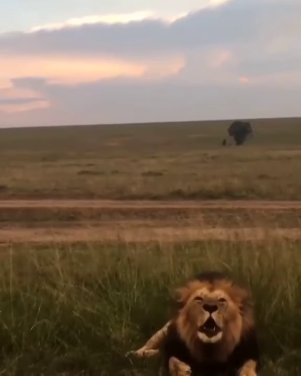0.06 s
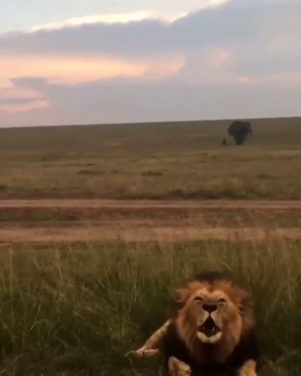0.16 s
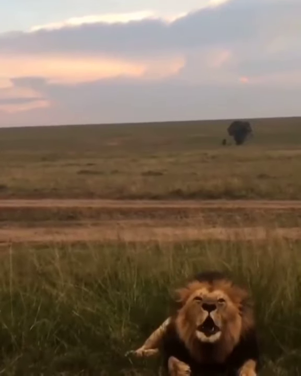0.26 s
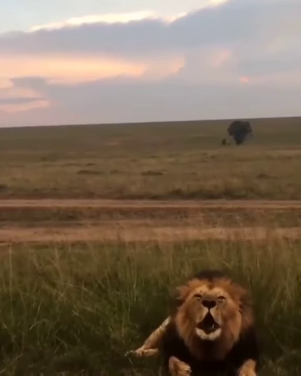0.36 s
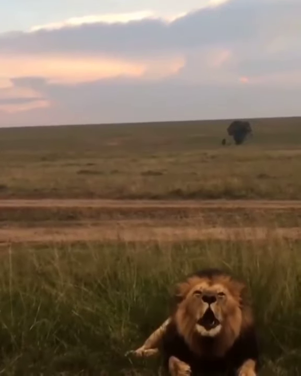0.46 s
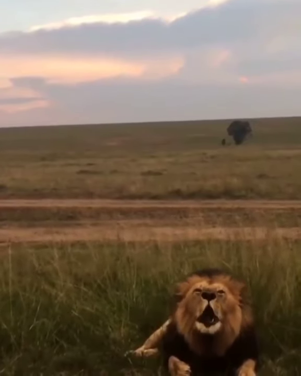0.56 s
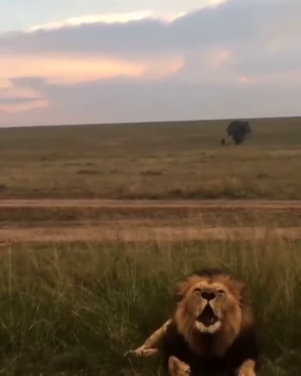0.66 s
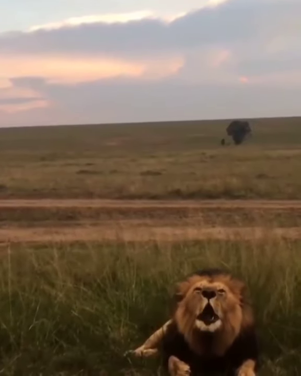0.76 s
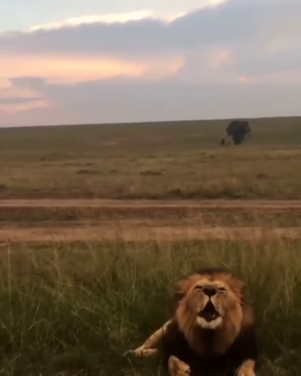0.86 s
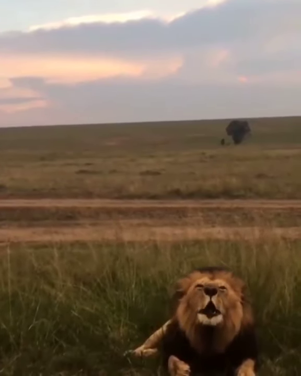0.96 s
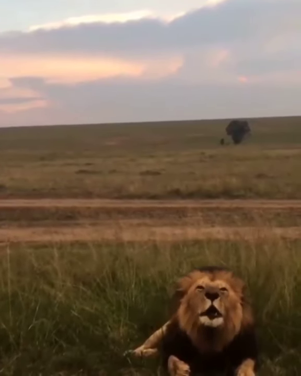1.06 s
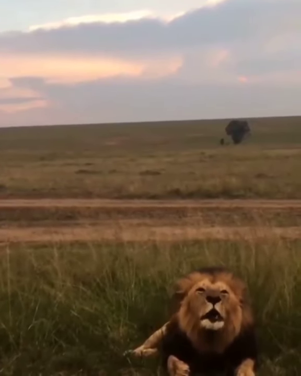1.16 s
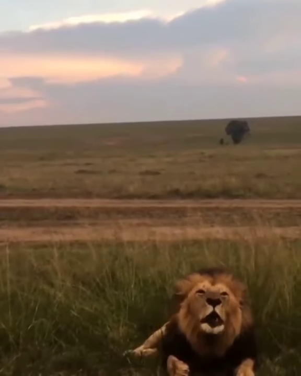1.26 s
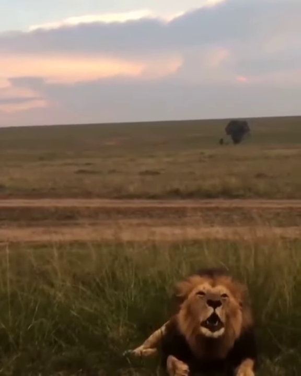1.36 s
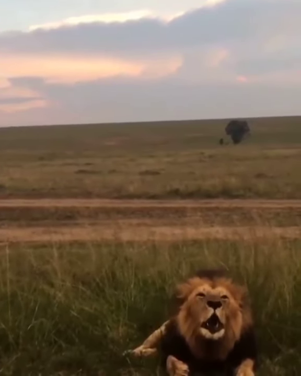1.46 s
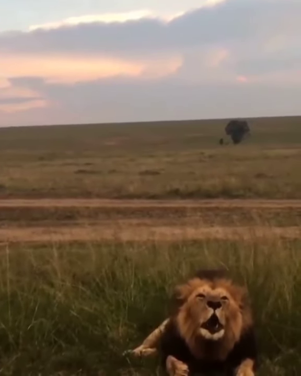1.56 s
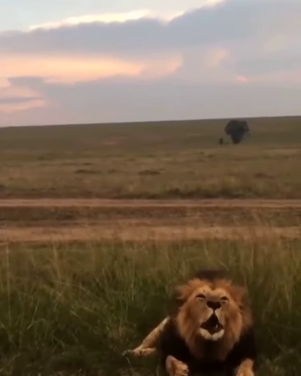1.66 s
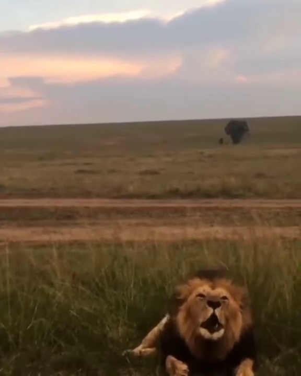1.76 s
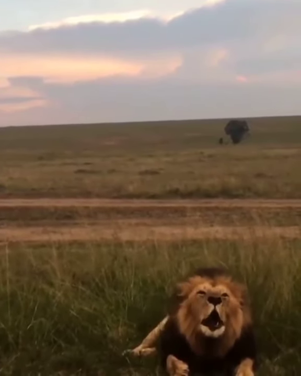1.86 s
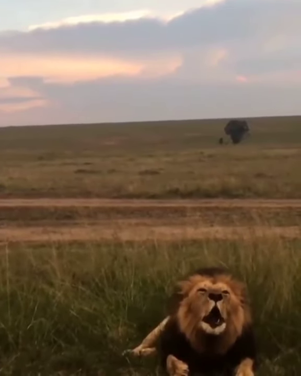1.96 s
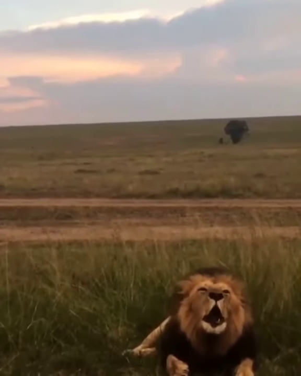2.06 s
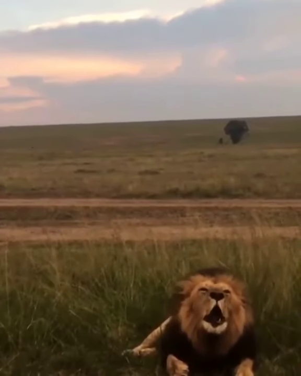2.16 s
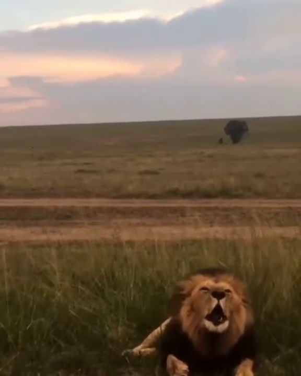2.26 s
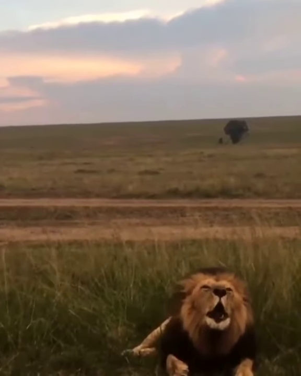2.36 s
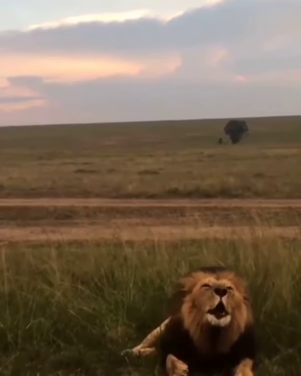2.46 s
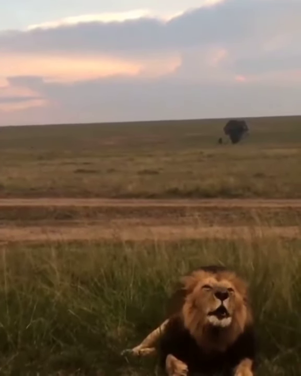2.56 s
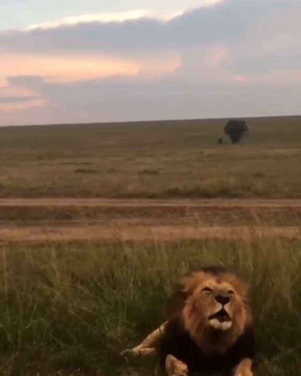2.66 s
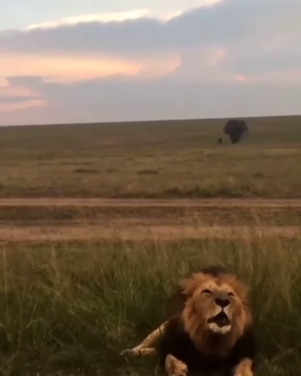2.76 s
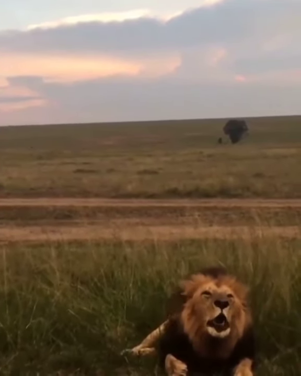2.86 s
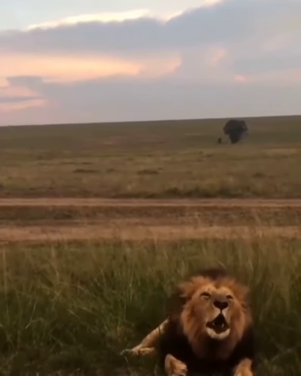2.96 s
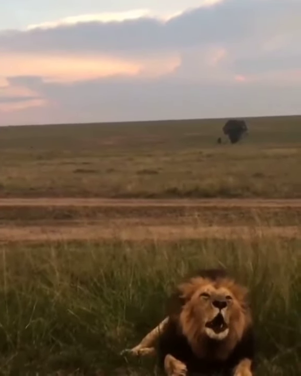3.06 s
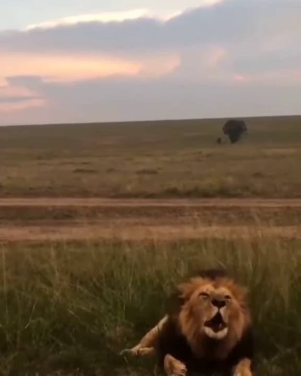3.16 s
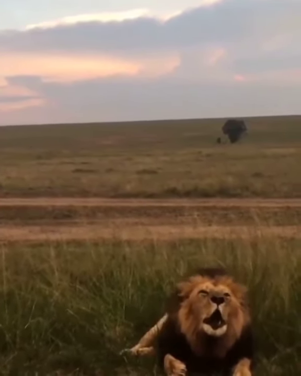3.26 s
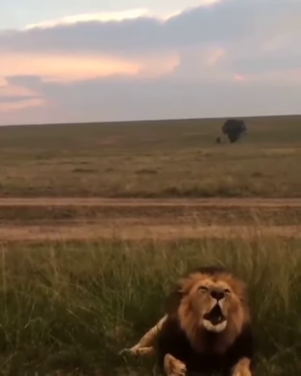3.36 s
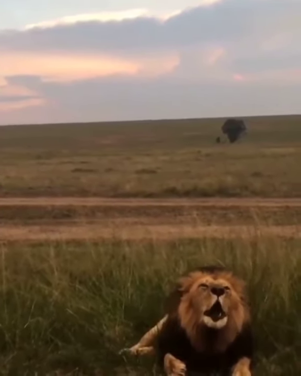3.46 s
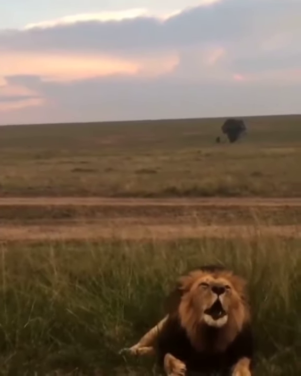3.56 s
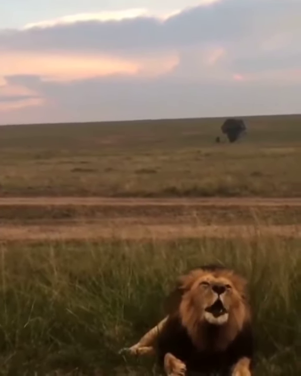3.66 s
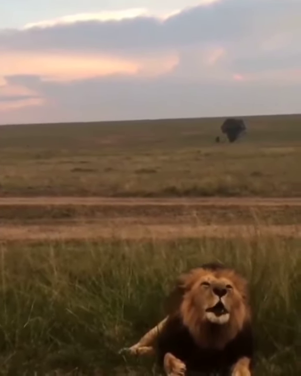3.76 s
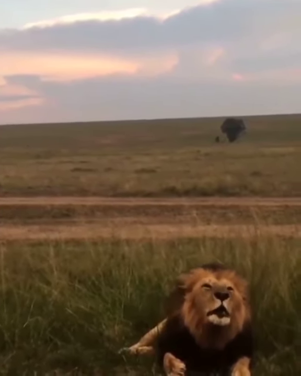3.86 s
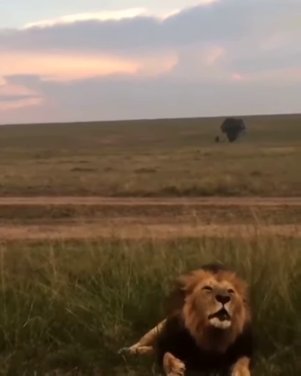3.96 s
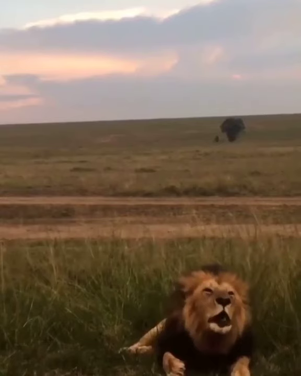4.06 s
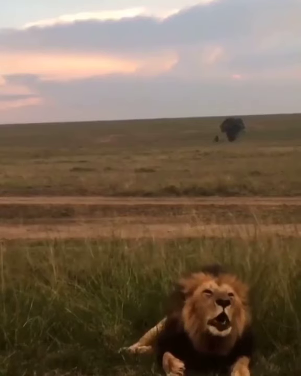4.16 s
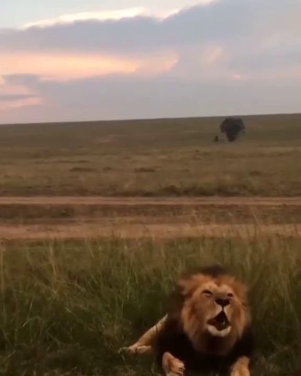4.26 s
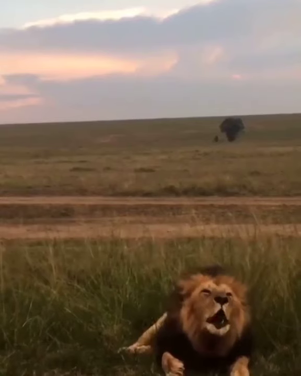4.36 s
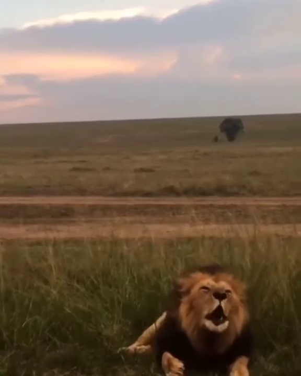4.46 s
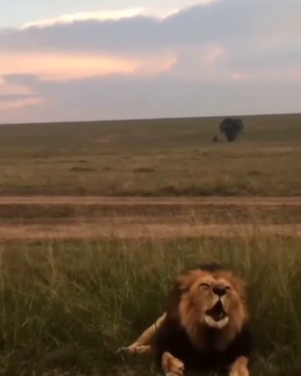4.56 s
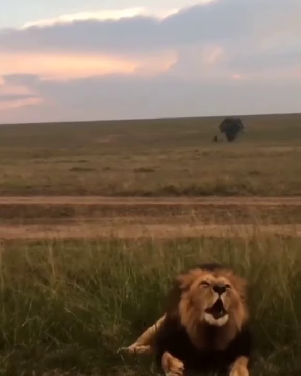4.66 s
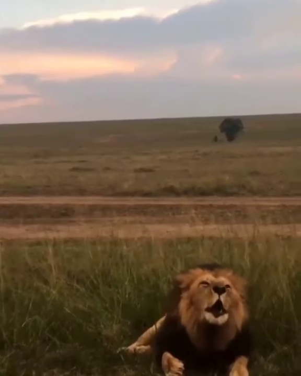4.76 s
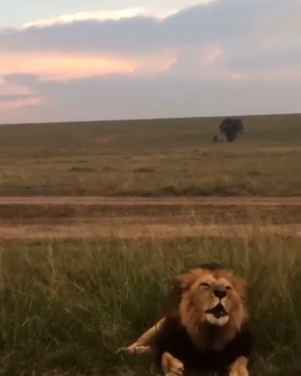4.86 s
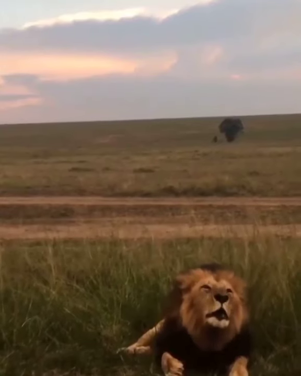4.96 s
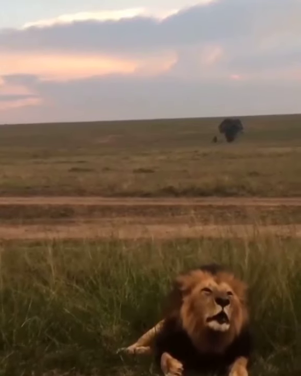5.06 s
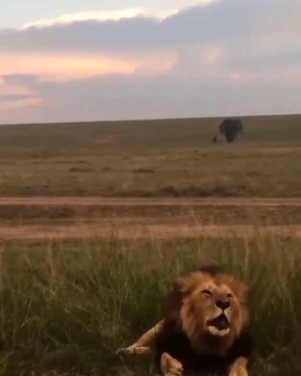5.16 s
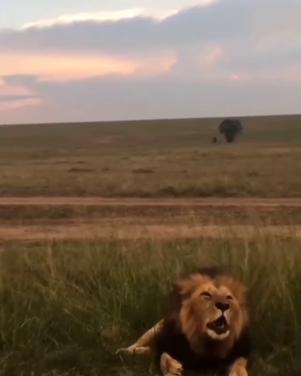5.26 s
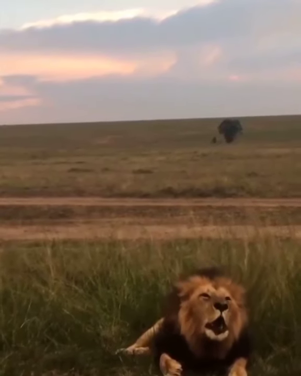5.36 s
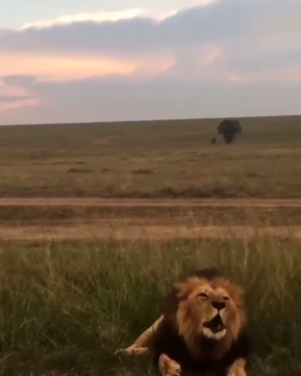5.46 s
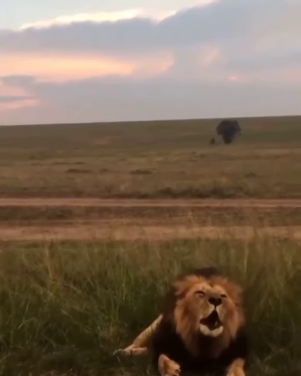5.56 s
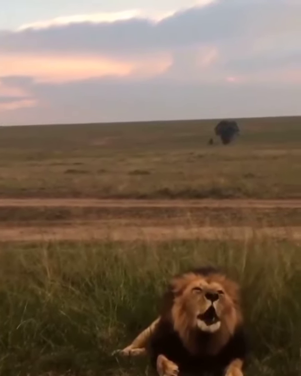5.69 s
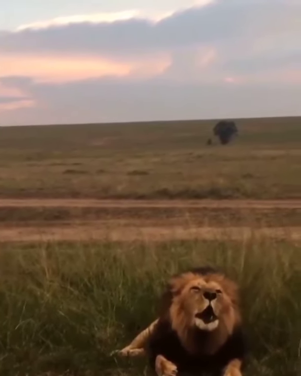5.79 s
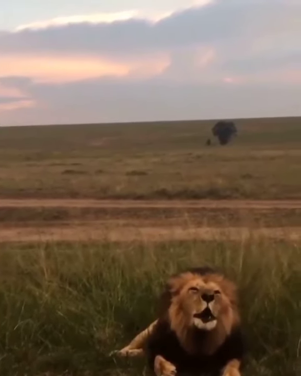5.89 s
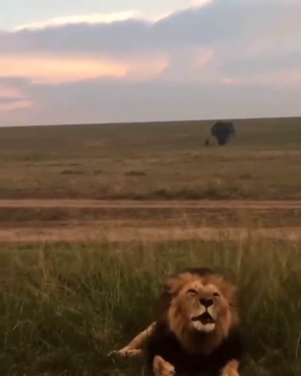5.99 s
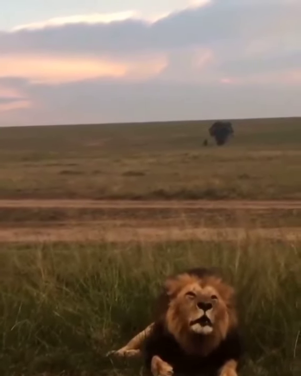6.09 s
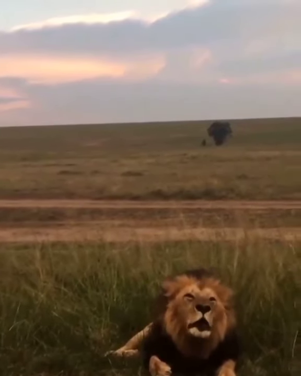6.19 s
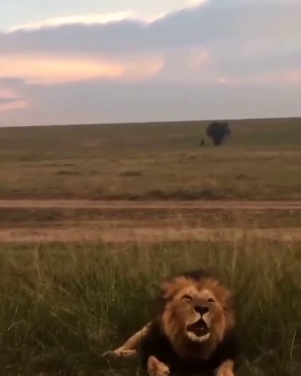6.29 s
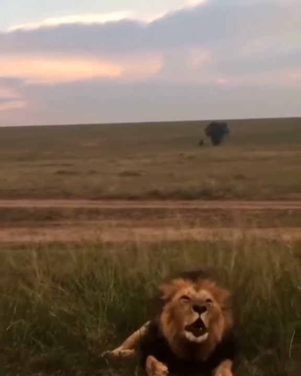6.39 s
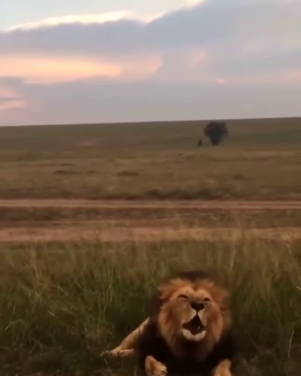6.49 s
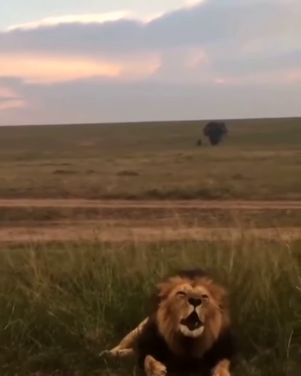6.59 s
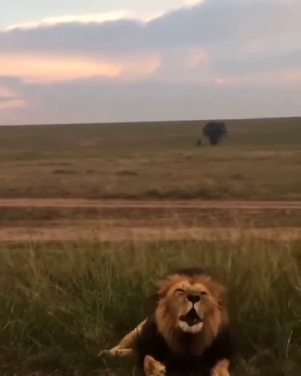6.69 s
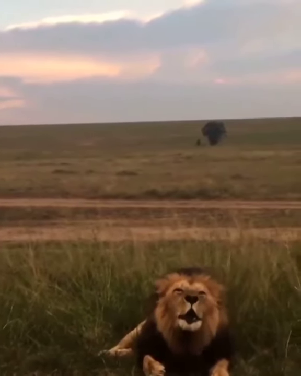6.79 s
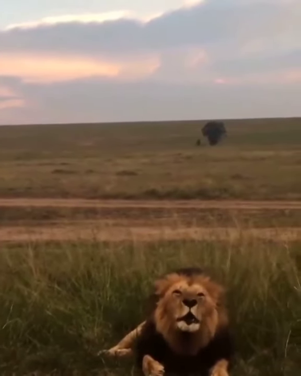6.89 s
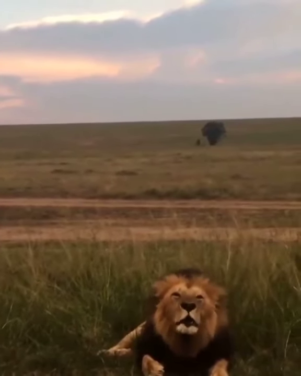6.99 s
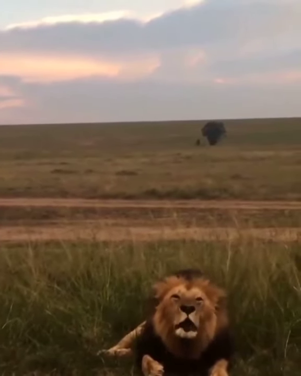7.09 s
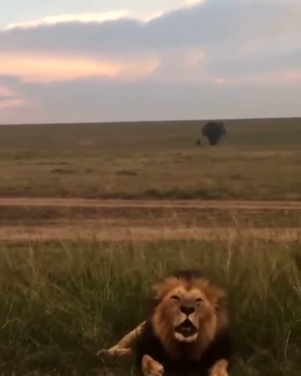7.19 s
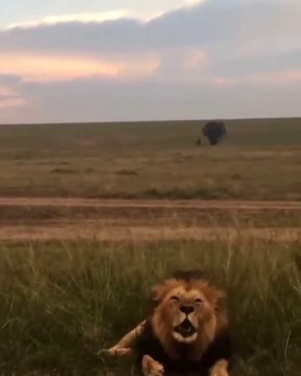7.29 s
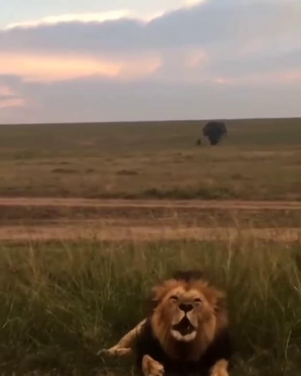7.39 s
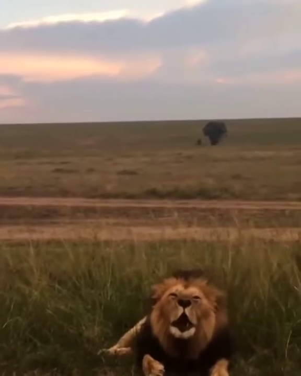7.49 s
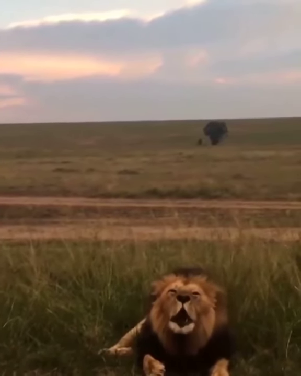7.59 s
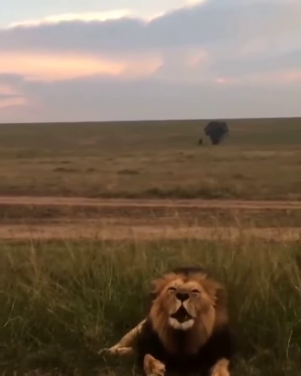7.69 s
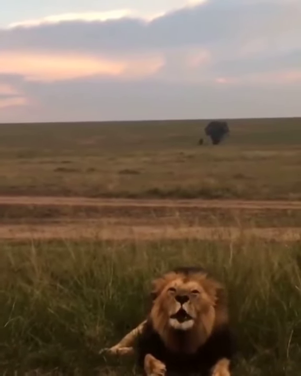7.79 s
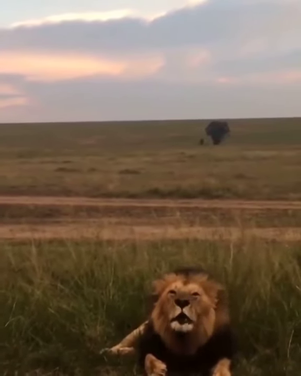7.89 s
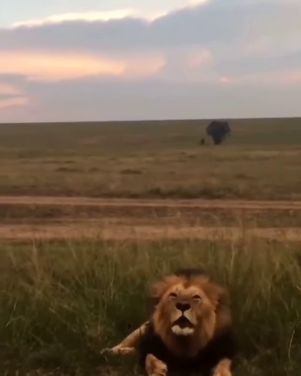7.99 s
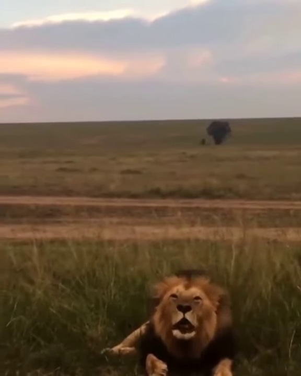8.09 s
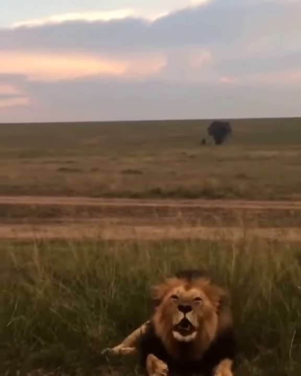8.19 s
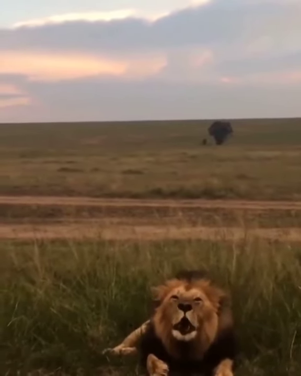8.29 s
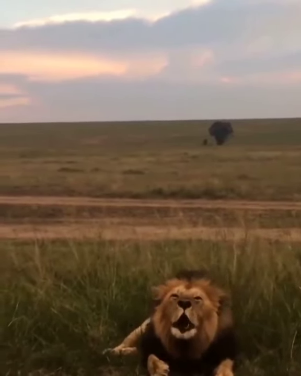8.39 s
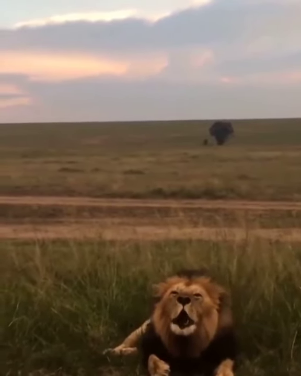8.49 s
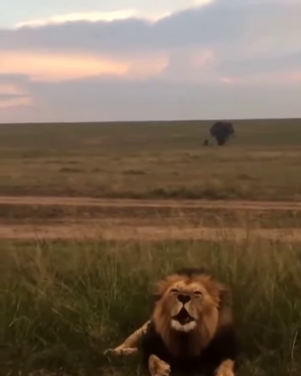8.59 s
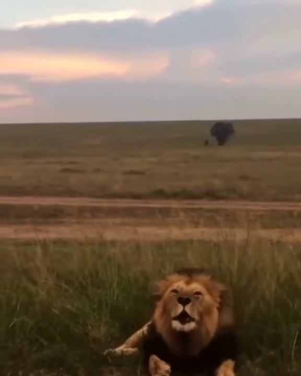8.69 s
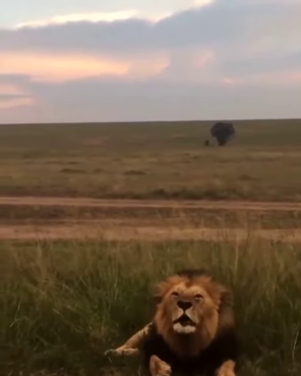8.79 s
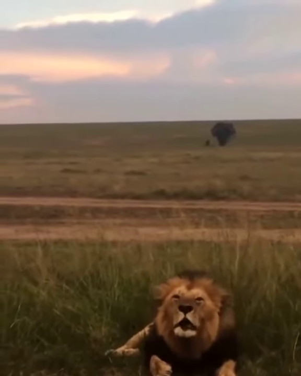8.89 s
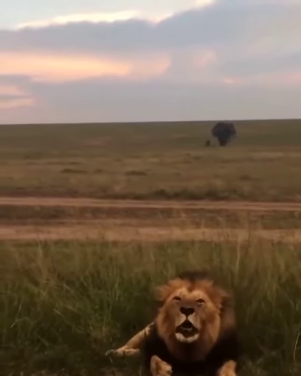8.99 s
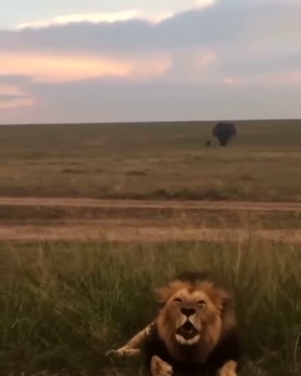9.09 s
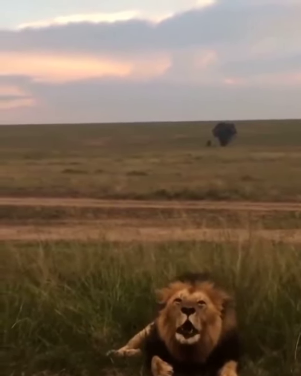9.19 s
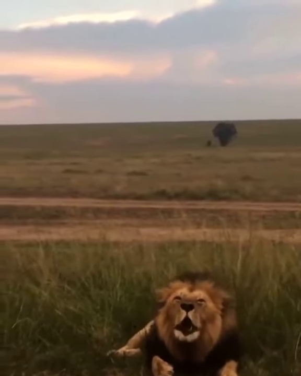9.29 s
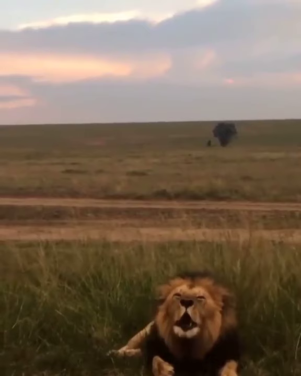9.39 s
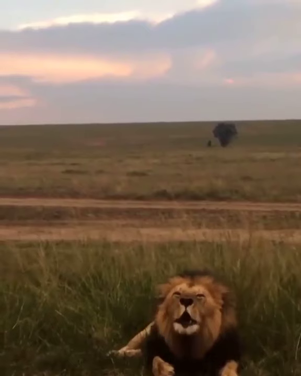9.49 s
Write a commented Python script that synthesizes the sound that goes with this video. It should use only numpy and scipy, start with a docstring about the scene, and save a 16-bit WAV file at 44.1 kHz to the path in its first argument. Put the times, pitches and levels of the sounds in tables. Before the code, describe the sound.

Close lion roaring outdoors: two long throaty roars, then progressively shorter, rougher barking grunts about a second apart, with faint gasps and soft wind rumble.

```python
"""Open grassland: a male lion lies close by and roars, long roars that shorten into a run of grunts.
Each roar is a string of clicks from his slack vocal folds plus puffs of air, ringing a long throat,
mouth and muzzle; the folds slap irregularly and steady into a tone at the height of the long roars.
Shaped noise makes the hiss of his breath, a faint murmur before each call, the gasps between calls
and the low rumble of wind; one faint squeak is a falling sine."""
import sys
import numpy as np
from scipy import signal
from scipy.io import wavfile
from scipy.ndimage import uniform_filter1d

SR = 44100
rng = np.random.default_rng(int(sys.argv[2]) if len(sys.argv) > 2 else 0)


def log_audio(samples):
    """Write samples as a 16-bit WAV file to the path given in sys.argv[1]."""
    # one column per channel
    frames = np.atleast_2d(samples).T
    # limit to full scale, then quantise
    limited = np.clip(frames, -1, 1)
    pcm = np.round(limited * 32767).astype(np.int16)
    wavfile.write(sys.argv[1], SR, pcm)


N = 420713
TIME = np.arange(N) / SR  # [s]
CUT_S = 0.022  # softness of the edges of calls and murmurs [s]

# The calls, one push of air each: (start [s], hold [s], release [s], effort [dB], sag over the hold [dB],
# top pitch before any leap [Hz], climb to the top [s], pitch fall [s],
# widest mouth [factor on the throat], extra mouth ring [dB])
CALLS = [ (0.447, 0.62, 0.057, -9.5, 3, 101.6, 0.29, 0.3, 1.13, 0.5),
         (1.89, 0.68, 0.064, -11.5, 0.5, 103, 0.37, .24, 1.134, .5),
         (3.358, .45, 0.075, -11.5, 1.8, 104.4, 0.22, .25, 1.065, 0.5),
         (4.55, 0.36, 0.095, -9, 6, 100.9, .16, .21, 1.064, 0.5),
         (5.665, 0.33, 0.15, -8, 7.5, 96.36, 0.15, 0.19, 1.04, 0.5),
         (6.672, 0.23, 0.1, -10, 4, 86.37, .11, .115, 1.037, -0.5),
         (7.621, 0.25, 0.085, -9, 6.5, 87.87, 0.12, .13, 1, -2.5),
         (8.546, 0.21, .1, -9, 5.5, 87.2, .11, 0.097, 1.014, -1.5),
         (9.43, .21, 0.079, -7, 10.5, 86.5, 0.13, .11, 1.04, -1.5)]
# Low resonances of the long throat: (pitch [Hz], width [Hz], relative level [dB],
# how far it follows the mouth [share, negative = the other way], gain per unit of opening [dB])
CHEST_RINGS = [(100.4, 84, -2.5, 0.5, -36), (147.8, 77.2, 5, .95, -6.5), (342, 52.3, -1.06, 0.78, 36.5),
               (448.5, 63, -16, 0.42, -28.5), (580, 88, -27.5, 0.1, 76.5), (726, 68, -26.5, 0.5, 26)]
# Resonances of the mouth, same columns
MOUTH_RINGS = [(860, 114, -12, -0.12, -20.5), (1032, 73, -0.5, 0.11, 16.5), (1146, 83, 1.5, 0.39, -3.5),
               (1346, 110, -4, 0.34, 8.5), (1530, 77, -10, 0.4, 8.5)]
# High resonances of the muzzle, same columns
MUZZLE_RINGS = [(1973, 130, 3.5, -0.0077, -9), (2260, 95, -2, .1, 8), (2590, 140, 2, 0.25, -10),
                (2802, 87, 3.5, 0.14, -8.5), (3136, 220, 0.5, 0.0048, -18.5), (3984, 240, -2, 0.17, -6.5),
                (4420, 220, -2.5, 0.22, -14), (5740, 1660, -9, .2, -10)]
# The bright edge that a hard-driven voice rings, same columns
EDGE_RINGS = [(4310, 160, 0, 0.053, 0.0014)]
# Colour of the rushing air: (frequency [Hz], relative level per Hz [dB])
AIR_COLOUR = [(600, -24.5), (1400, 8), (2300, -2.5), (2800, -7), (3650, 1.5), (4850, -3), (5600, -1.5),
              (7000, -3), (8900, -4), (9700, -8.5), (11800, -6.5), (14000, -16)]
# The mouth rings out briefly as the pitch glides: (middle [s], half length [s], boost [dB])
MOUTH_FLARES = [(.585, 0.022, 3.5), (3.551, .025, 4.5), (3.74, .02, 5), (4.843, 0.028, 10),
                (5.905, .02, 7.5)]
# How the chest answers the folds: (level against the effort [dB], change when locked [dB],
# in the high register [dB], in a full surge [dB], in the tail [dB])
CHEST_ANSWER = (0, -1.5, -3.5, 3, -0.5)
# How the mouth answers, same columns
MOUTH_ANSWER = (-15, -2, -2.5, 4.5, -3.5)
# How the hiss of breath answers, same columns
HISS_ANSWER = (-24.5, 0.5, -4, 1.5, -1.5)


def roars(muzzle_db=-3, air_db=-3, edge_db=-27.0, edge_rough_db=13.0, edge_growth=1.0,
          air_click=0.13, gentle=0.24, flutter_db=0.53, break_db=-9, tail_flutter=0.8, hiss_growth_db_per_s=7.5):
    """Fold pulses and turbulence ring the throat, mouth and muzzle; air rushes past the teeth."""
    effort_db, pitch, opening, bright_db, tail, gate = call_controls()
    locked, rough, leap, high, swell_db, breaks = registers()
    surge = surges() * (1 + tail_flutter * tail)  # slaps stand out more in the tail

    def answer(table):
        base_db, *change_db = table
        return base_db + sum(db * state for db, state in zip(change_db, (locked, high, surge, tail)))

    chest_db, ring_db, hiss_db = answer(CHEST_ANSWER), answer(MOUTH_ANSWER), answer(HISS_ANSWER)
    # the hiss gains on the voice as a call goes on
    for start, hold, *_ in CALLS:
        during = window(start, start + hold + CUT_S, CUT_S)
        hiss_db = hiss_db + hiss_growth_db_per_s * (TIME - start) * during
    for middle, half, db in MOUTH_FLARES:
        ring_db = ring_db + db * np.exp(-((TIME - middle) / half) ** 2)

    # a slam adds little bass and much bite, so the bass gets softer slaps
    pulses = fold_pulses(pitch * leap, rough)
    thuds = with_slaps(pulses, softer_db=-6)
    snaps = with_slaps(pulses)
    clicks = steadied(snaps)
    low_air = puffs(thuds, decay_s=.005, leak=.4)
    mid_air = puffs(snaps, decay_s=.003, leak=.8)
    high_air = puffs(snaps, decay_s=.003, leak=1.3)
    rush_air = puffs(snaps, decay_s=.0022, leak=4)
    low_drive = steadied(thuds) + (.1 + .4 * rough) * low_air
    mid_drive = clicks + (.6 + .35 * rough) * mid_air
    high_drive = .55 * clicks + high_air

    low_cut = signal.butter(2, 44, "high", fs=SR, output="sos")
    soft_drive = mellowed(low_drive, gentle * locked * high)
    chest = steadied(signal.sosfilt(low_cut, throat(soft_drive, CHEST_RINGS, opening)))
    mouth = steadied(throat(mid_drive, MOUTH_RINGS, opening, quiver=.012, quiver_db=2))
    muzzle = steadied(throat(high_drive, MUZZLE_RINGS, opening, quiver=.024, quiver_db=3.3))
    edge = steadied(throat(high_drive, EDGE_RINGS, opening, quiver=.012))
    air = steadied(coloured(air_click * clicks + rush_air, AIR_COLOUR))

    # the edge grows faster than the voice itself
    bite_db = edge_db + edge_rough_db * rough + edge_growth * (effort_db + chest_db)
    voice = amp(chest_db + swell_db + break_db * breaks) * chest
    voice = voice + amp(ring_db + bright_db) * mouth + amp(bite_db) * edge
    rush_level = amp(hiss_db + swell_db + flutter_db * wobble(size=600))
    rush = rush_level * (amp(muzzle_db) * muzzle + amp(air_db) * air)
    return amp(effort_db) * gate * (voice + rush)


def call_controls(onset_db=-32.5, attack_s=0.026, tail_db=-16, tail_s=0.12, slack_hz=56.69,
                  climb_share=.87, arch_power=2.3, shut=0.748, ajar=0.942, open_s=.04, close_power=2.63):
    """Each push of air swells, sags and sinks to a growl; pitch arches up and back, the mouth opens fast, shuts slowly."""
    effort_db, pitch, opening = np.full(N, -100.), np.full(N, 1. * slack_hz), np.full(N, 1. * shut)
    bright_db, tail, gate = np.zeros((3, N))
    for start, hold, release, db, sag_db, top_hz, climb, fall, gape, brightness in CALLS:
        now = TIME >= start
        t = TIME[now] - start
        tail[now] = np.clip((t - hold) / release, 0, 1)
        swell_db = onset_db * np.exp(-t / attack_s)
        sink_db = tail_db * tail[now] - sag_db * np.minimum(t / hold, 1)
        effort_db[now] = db + swell_db + sink_db
        from_top = abs(t - climb) / np.where(t < climb, climb_share * climb, fall)
        pitch[now] = slack_hz + (top_hz - slack_hz) * np.exp(-from_top ** arch_power)
        opened = gape + (ajar - gape) * np.exp(-t / open_s)
        closing = np.minimum(t / (hold + tail_s), 1) ** close_power
        opening[now] = opened + (shut - opened) * closing
        bright_db[now] = brightness
        gate[now] = window(start, start + hold + tail_s, CUT_S)[now]
    return effort_db, pitch, opening, bright_db, tail, gate


# In the long roars the folds lock into a tone: (start [s], length [s], roughness [0-1], leap in pitch [factor])
LOCKED_TONES = [(0.678, 0.21, .06, 1.64), (2.151, .26, 0.07, 1.64), (3.491, 0.21, 0.12, 1),
                (4.7, .19, .27, 1), (5.795, .15, .34, 1)]


def registers(loose_rough=.66, lock_s=.025, leap_s=0.011, early_s=.115, late_s=.04,
              break_s=0.011, swell_db_per_s=20.5):
    """Locked folds slap less roughly; some leap to a high register that swells, with a break at each change."""
    locked, high, swell_db, breaks = np.zeros((4, N))
    rough, leap = np.full(N, loose_rough), np.ones(N)
    for start, length, tone_rough, factor in LOCKED_TONES:
        end = start + length
        lock = window(start, end, lock_s)
        locked += lock
        rough += (tone_rough - loose_rough) * lock
        if factor > 1.3:
            # the high register begins before the tone and outlasts it
            up = window(start - early_s, end + late_s, leap_s)
            high += up
            leap += (factor - 1) * up
            swell_db += swell_db_per_s * (TIME - start - length / 2) * lock
            for s in (start - early_s * .6, end + late_s / 2):
                breaks += np.exp(-((TIME - s) / break_s) ** 2)
    return locked, np.clip(rough, 0, 1), leap, high, swell_db, breaks


def fold_pulses(hz, rough, shimmer_db=3.5, limp_db=5.0):
    """One click a closure; rough folds stumble in time and alternate strong and weak."""
    turns = np.cumsum(hz * np.exp(.13 * rough * wobble(size=260))) / SR
    at = np.flatnonzero(np.diff(np.floor(turns)) > 0)
    chance = np.clip(rng.standard_normal(N)[at], -2, 1.2)
    strong_weak = (-1) ** np.arange(len(at))
    pulses = np.zeros(N)
    pulses[at] = amp(rough[at] * (shimmer_db * chance + limp_db * strong_weak))
    return pulses


# Single hard slaps of the folds: (time [s], level over a plain click, before any softening [dB])
HARD_SLAPS = [(0.547, 11.5), (1.149, 1), (1.941, 7), (2.007, 11.5), (2.661, 14.5), (3.391, 11.5),
              (3.907, 13), (4.582, 12), (4.621, 7.5), (4.945, 11), (5.005, 9), (5.691, 9), (5.765, 8.5),
              (6.024, 10), (6.079, 15.5), (6.705, 4.5), (6.745, 4), (6.779, 11.5), (6.993, 8.5), (7.665, 7),
              (7.691, 9), (7.727, 12), (7.749, 14.5), (7.959, 14), (8.588, 6), (8.614, 3), (8.651, 8.5),
              (8.85, 2), (9.478, 11.5)]


def with_slaps(pulses, softer_db=0):
    """Now and then one closure is a hard slam that takes the place of its neighbours."""
    out = pulses.copy()
    for s, db in HARD_SLAPS:
        at = round(s * SR)
        out[max(at - 260, 0):at + 200] = 0
        out[min(at, N - 1)] = amp(db + softer_db)
    return out


def surges(full_db=13, fade_s=.024):
    """Each hard slap lets a brief surge of air through."""
    surge = np.zeros(N)
    for s, db in HARD_SLAPS:
        fade = np.exp(-abs(TIME - s) / fade_s) * (TIME >= s)
        surge = np.maximum(surge, amp(db - full_db) * fade)
    return surge


def puffs(pulses, decay_s, leak):
    """Turbulence: a burst of noise at each closure over a steady leak of air."""
    bursts = signal.lfilter([1], [1, -np.exp(-1 / (decay_s * SR))], pulses)
    return steadied((steadied(bursts) + leak) * rng.standard_normal(N))


def mellowed(x, share, corner_hz=150):
    """Folds that close gently lose their upper harmonics: blends in a low-passed copy."""
    r = np.exp(-2 * np.pi * corner_hz / SR)
    dull = signal.lfilter([1 - r], [1, -r], x)
    return x + np.clip(share, 0, 1) * (dull - x)


def throat(x, modes, opening, quiver=0, quiver_db=0):
    """Steep resonances that move as the mouth opens and quiver with its soft walls."""
    out = np.zeros(N)
    for k, (hz, width, db, follow, open_db) in enumerate(modes):
        centre = hz * (1 + follow * (opening - 1) + quiver * wobble(size=2400))
        # shift the resonance down to 0 Hz, low-pass there, shift back
        turn = np.exp(2j * np.pi * np.cumsum(centre) / SR)
        r = np.exp(-np.pi * width / SR)
        ring = signal.lfilter([(1 - r) ** 2], [1, -2 * r, r * r], x * turn.conj() + 1e-18)
        level = amp(db + open_db * (opening - 1) + quiver_db * wobble(size=1800))
        out += (-1) ** k * level * (turn * ring).real  # neighbours alternate in sign
    return out


# Gasps after the calls: (middle [s], level before flutter [dB], length [s])
GASP_TIMES = [(1.37, -57, .12), (1.46, -54, .08), (2.89, -65, .25), (4.035, -58, .08), (4.11, -52, .07),
              (5.1, -59, .1), (5.185, -52, .09), (7.25, -64.5, .32), (8.17, -66, .25), (9.06, -71, .22)]
# Colour of the gasps: (frequency [Hz], relative level per Hz [dB])
GASP_TINT = [(240, -31), (400, -5.5), (431, -2), (464, -14.5), (663, 3), (817, -7), (867, -8), (1640, -4.5),
             (2120, -10), (3360, -11.5), (4870, -17.5), (12600, -25), (14000, -41)]


def gasps(flutter_db=3.0):
    """The lion draws air in short fluttering gulps: swells of coloured noise."""
    swell = np.zeros(N)
    for middle, db, length in GASP_TIMES:
        swell += amp(db) * np.cos(np.pi * np.clip((TIME - middle) / length, -.5, .5))
    return swell * amp(flutter_db * wobble(size=400)) * noise(GASP_TINT)


# A faint murmur before each call: (start [s], length [s], level before flutter and ring [dB])
MURMUR_TIMES = [(0.021, 0.44, -57), (1.466, 0.49, -55.5), (2.937, 0.43, -55), (4.203, 0.33, -53),
                (5.307, 0.35, -56), (6.352, 0.327, -56), (7.328, 0.33, -53.5), (8.269, .26, -53),
                (9.157, 0.28, -61)]
# Colour of the murmur, like the roar: (frequency [Hz], relative level per Hz [dB])
MURMUR_TINT = [(100, -4), (165, 8), (250, -5), (350, 0), (460, -2), (560, -14), (920, -14), (1060, 0),
               (1180, 1), (1420, -3), (1620, -15), (2000, -14), (2500, -27), (3600, -31), (4400, -22),
               (5200, -33), (9000, -40)]


def murmurs(flutter_db=2, swell_s=0.16, ring_db=-7, ring_hz=1150, ring_width_hz=90):
    """A faint murmur before each call, coloured like the roar: swelling shaped noise with a narrow ring."""
    swell = np.zeros(N)
    for start, length, db in MURMUR_TIMES:
        rise = np.clip((TIME - start) / swell_s, 0, 1)
        swell += amp(db) * rise * window(start, start + length, CUT_S)
    ring_mode = [(ring_hz, ring_width_hz, 0, 0, 0)]
    ring = evened(throat(rng.standard_normal(N), ring_mode, 1, quiver=0.035))
    murmur = noise(MURMUR_TINT) + amp(ring_db) * ring
    return swell * amp(flutter_db * wobble(size=500)) * murmur


def squeak(start=3.02, length=0.017, from_hz=2450, to_hz=1850, level_db=-62):
    """One faint falling squeak early in a murmur: a sine that glides down."""
    hz = np.interp(TIME, [start, start + length], [from_hz, to_hz])
    tone = np.sin(2 * np.pi * np.cumsum(hz) / SR)
    return amp(level_db) * window(start, start + length, CUT_S / 2) * tone


def scatter(x, wet_db=-20, t60=0.26):
    """Ground and grass throw back a short, dull tail of fading noise."""
    t = TIME[:SR // 3]
    dull_noise = signal.lfilter([1], [1, -.5], rng.standard_normal(len(t)))
    tail = dull_noise * amp(-60 * t / t60) * (t > .004)
    return amp(wet_db) * signal.oaconvolve(x, tail / np.linalg.norm(tail))[:N]


# Strength of the wind: (time [s], level before the trim and gusts [dB])
WIND_STRENGTH = [(0, -45.5), (1.3, -50.5), (2.8, -47), (3.1, -55), (4.2, -41.5), (5.4, -47), (6.3, -45),
                 (6.6, -49.5), (7.2, -45.5), (8.3, -47.5), (9.5, -40.5)]
# Colour of the wind: (frequency [Hz], relative level per Hz [dB])
WIND_TINT = [(20, -31), (35, -7), (53, 7.5), (75, 1.5), (105, -4.5), (150, -13.5), (300, -24), (700, -32.5),
             (3000, -58.5)]
# Colour of the open country's hiss: (frequency [Hz], relative level per Hz [dB])
FIELD_TINT = [(100, -15), (400, -7.5), (1000, -5), (3000, -5), (13000, -15)]


def grassland(wind_db=-1, field_db=-71):
    """Lumpy wind rumble over the faint hiss of open country, both coloured noise."""
    gusts_db = 3.2 * wobble(size=3000)
    wind = amp(wind_db + curves(WIND_STRENGTH)[0] + gusts_db) * noise(WIND_TINT)
    return wind + amp(field_db) * noise(FIELD_TINT)


def amp(db):
    """Decibels to gain."""
    return 10 ** (np.asarray(db) / 20)


def evened(x):
    """Scales to rms 1."""
    return x / np.sqrt(np.mean(x ** 2) + 1e-20)


def steadied(x, size=1500):
    """Holds the running rms near 1 and keeps the single pulses."""
    power = uniform_filter1d(uniform_filter1d(x ** 2, size), size)
    return x / np.sqrt(abs(power) + 1e-12)


def wobble(size):
    """Smooth chance of rms 1 that changes over about `size` samples."""
    return evened(uniform_filter1d(uniform_filter1d(rng.standard_normal(N), size), size // 2))


def window(start, end, edge_s):
    """Near one between two times, near zero outside, with soft edges."""
    return (np.tanh((TIME - start) / edge_s) - np.tanh((TIME - end) / edge_s)) / 2


def curves(rows):
    """The columns of a table, joined by straight lines in time."""
    s, *columns = np.transpose(rows)
    return [np.interp(TIME, s, c) for c in columns]


def coloured(x, points):
    """Filters with the given spectrum, without sounding ahead of time (minimum phase)."""
    hz, db = np.transpose(points)
    f = np.fft.rfftfreq(4096, 1 / SR)
    octaves_below = np.minimum(np.log2((f + 1) / hz[0]), 0)
    curve_db = np.interp(np.log(f + 1), np.log(hz), db) + 12 * octaves_below
    log_gain = np.log(amp(np.maximum(curve_db, -100)))
    circle = np.concatenate([log_gain, log_gain[-2:0:-1]])
    taps = np.fft.ifft(np.exp(np.conj(signal.hilbert(circle)))).real
    return signal.oaconvolve(x, taps)[:N]


def noise(points):
    """Noise of rms 1 with the given spectrum."""
    return evened(coloured(rng.standard_normal(N), points))


def scene():
    """The lion, close by, in the open."""
    lion = roars() + gasps() + murmurs() + squeak()
    return (lion + scatter(lion) + grassland())[None]


def record(dry, top_hz=14200):
    """The loudest peaks are rounded off; then the highest treble is cut."""
    rounded = dry / (1 + dry ** 8) ** (1 / 8)
    low_pass = signal.firwin(255, top_hz, window=("kaiser", 8), fs=SR)
    return signal.oaconvolve(rounded, low_pass[None], "same")


dry = scene()
out = record(dry)
log_audio(out)
```